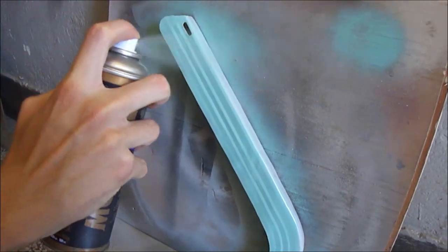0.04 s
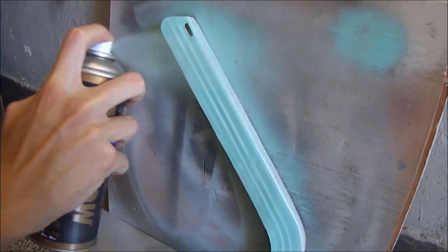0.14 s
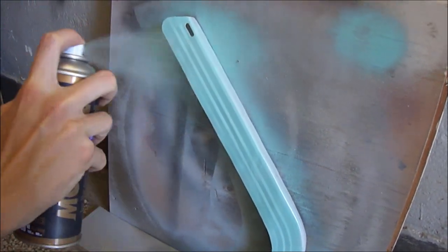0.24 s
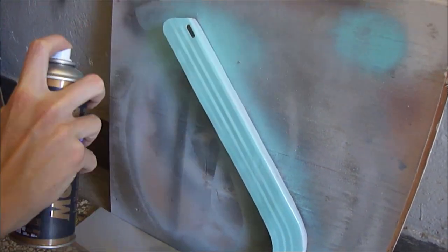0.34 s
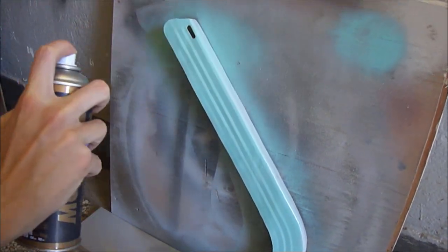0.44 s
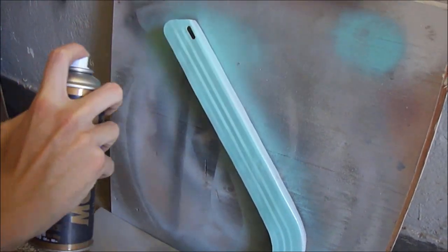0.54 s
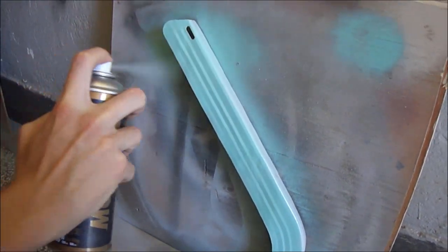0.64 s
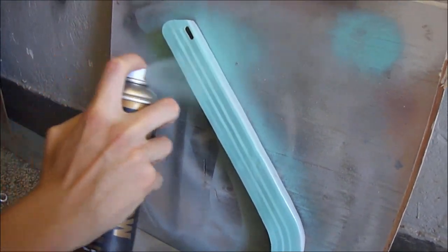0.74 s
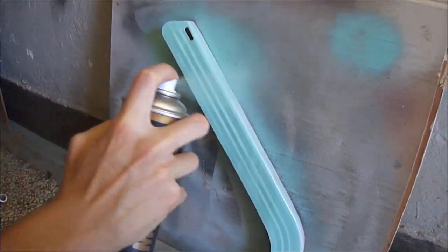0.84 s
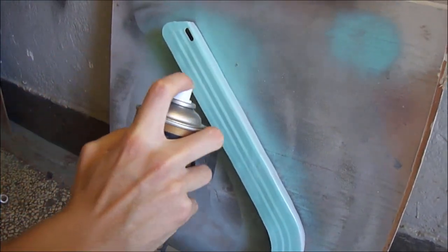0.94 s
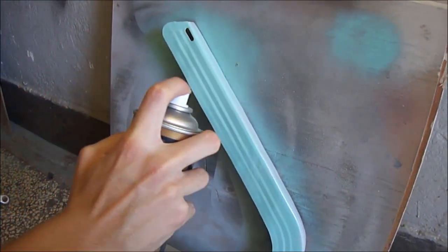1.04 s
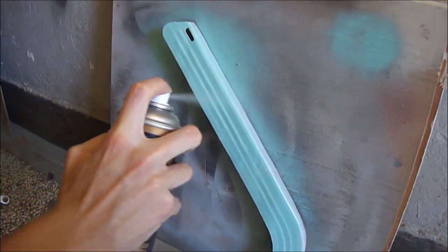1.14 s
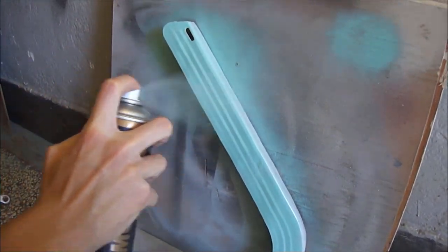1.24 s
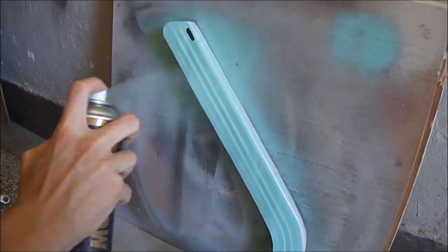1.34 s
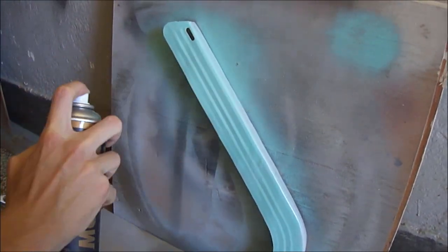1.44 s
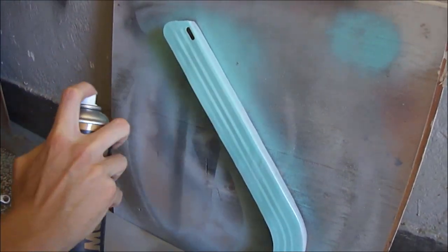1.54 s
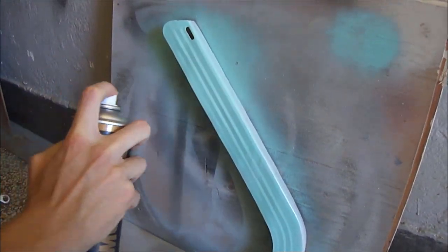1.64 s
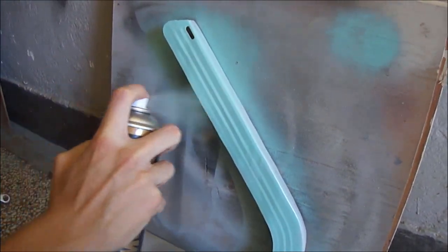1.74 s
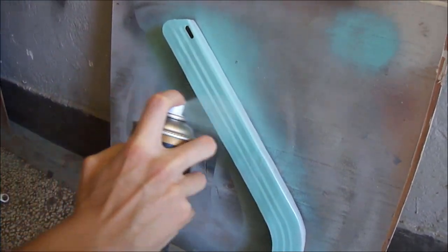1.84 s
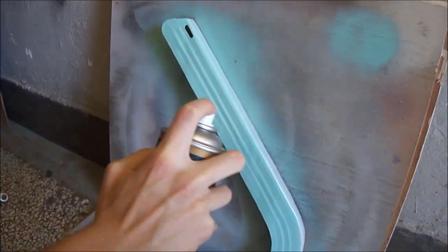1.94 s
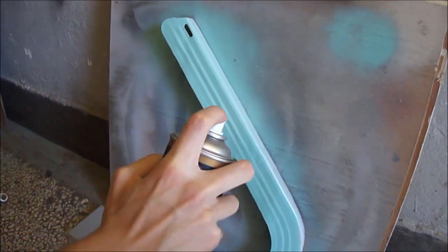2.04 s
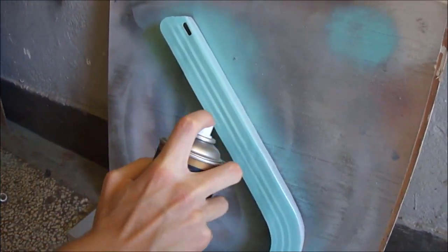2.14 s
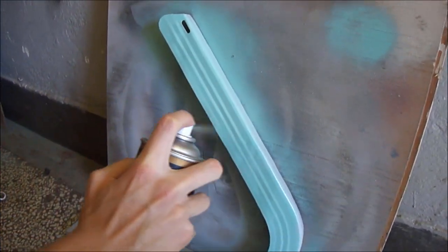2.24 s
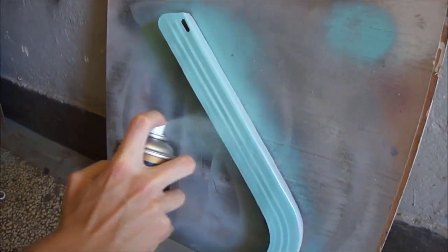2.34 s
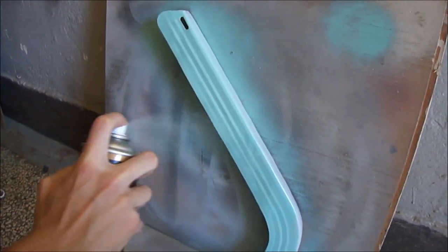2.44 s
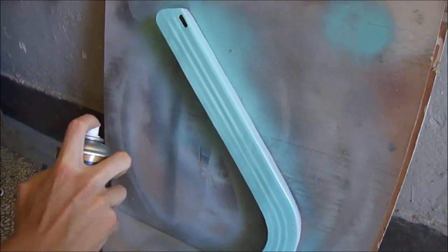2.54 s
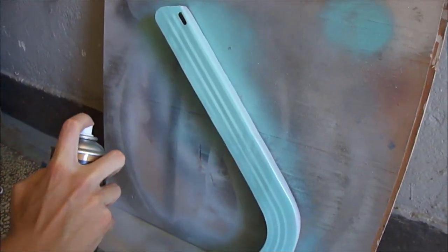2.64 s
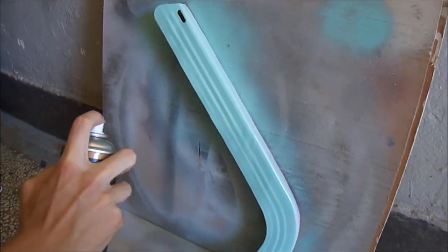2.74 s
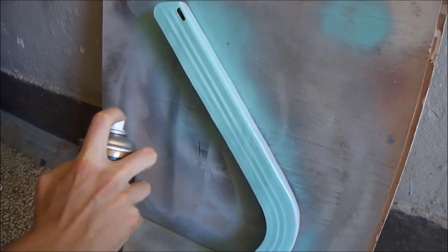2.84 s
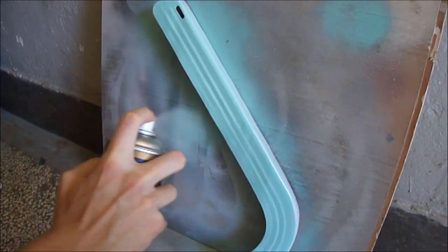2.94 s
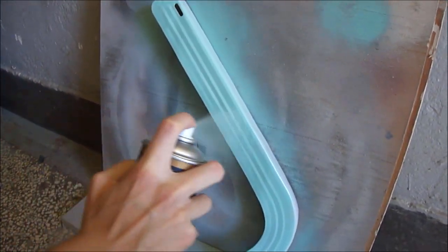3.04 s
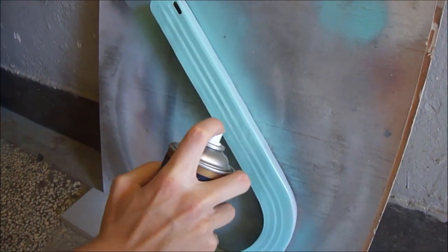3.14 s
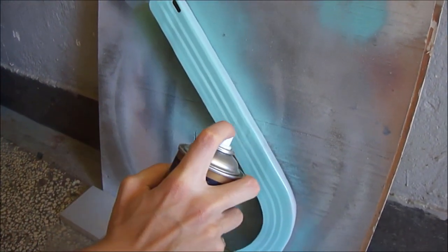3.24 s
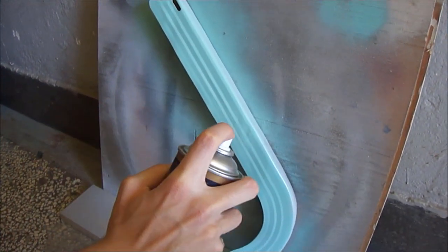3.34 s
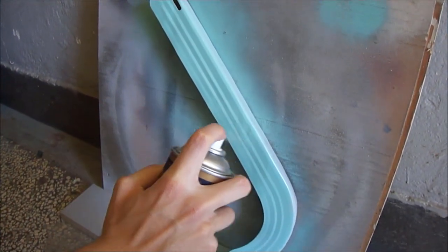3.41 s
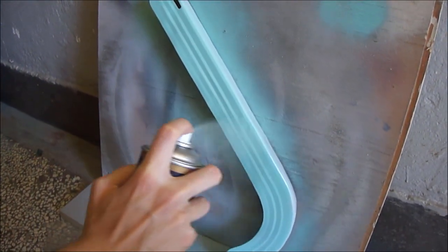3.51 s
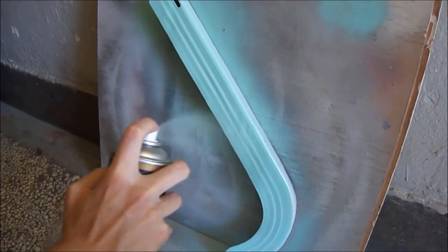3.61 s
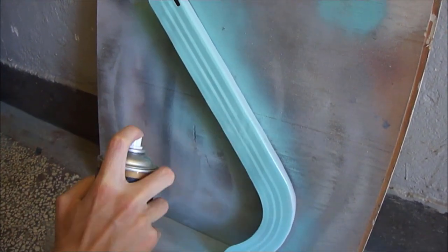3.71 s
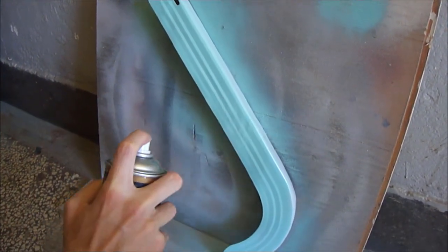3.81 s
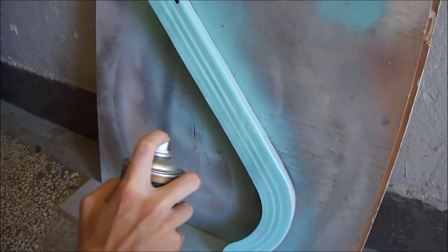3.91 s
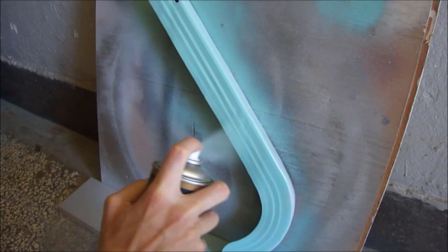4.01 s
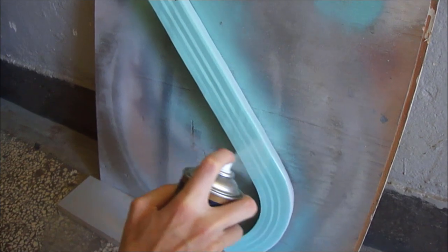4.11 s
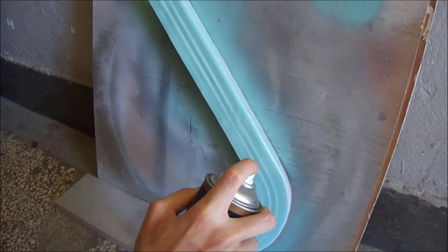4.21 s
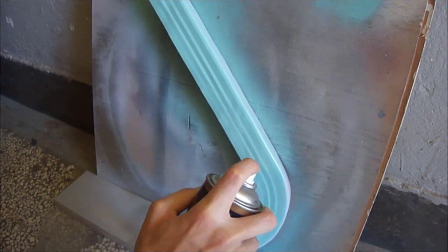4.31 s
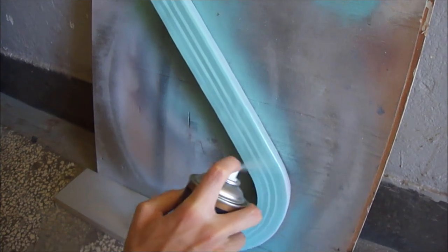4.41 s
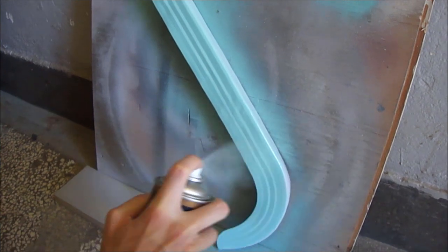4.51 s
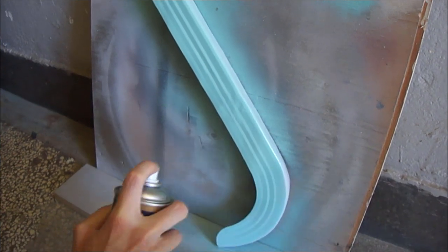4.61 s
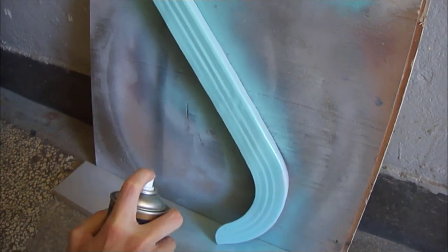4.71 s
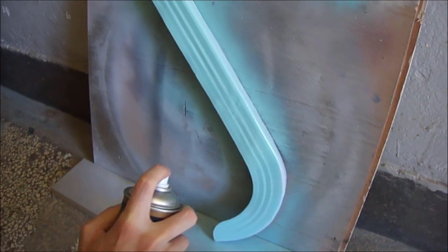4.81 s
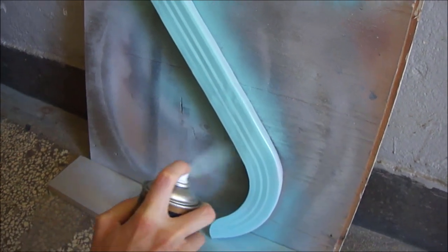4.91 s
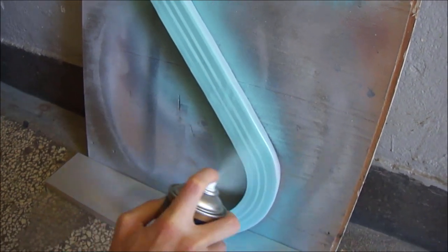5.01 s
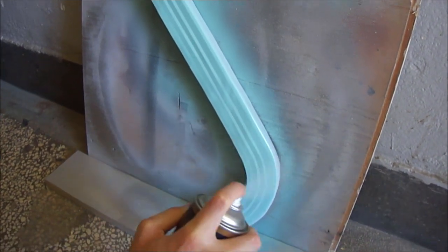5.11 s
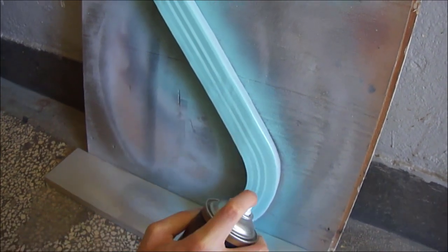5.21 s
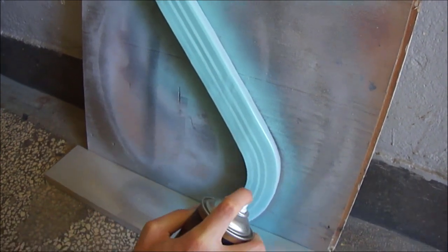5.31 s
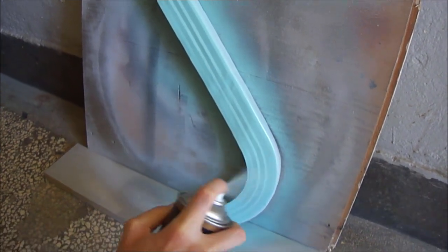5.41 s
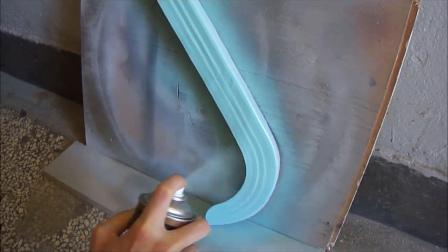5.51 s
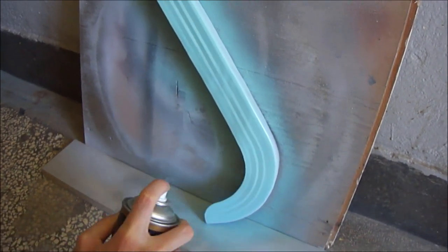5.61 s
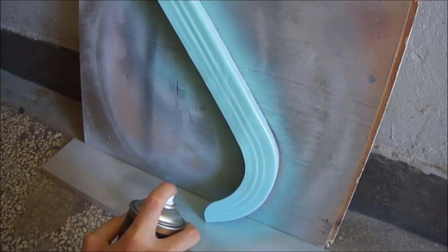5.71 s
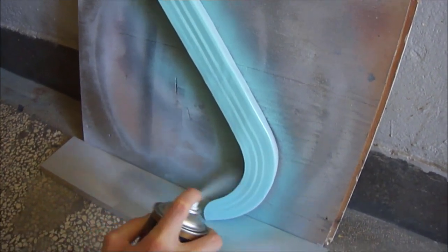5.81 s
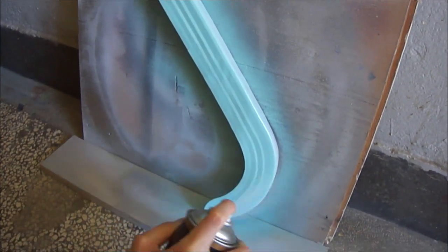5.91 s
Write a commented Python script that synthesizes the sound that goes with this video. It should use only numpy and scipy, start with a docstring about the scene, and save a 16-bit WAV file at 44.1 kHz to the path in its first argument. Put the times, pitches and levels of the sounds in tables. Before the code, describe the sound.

A spray paint can hisses in a dozen short, quick bursts, with light mixing ball ticks and a faint fan hum in a workshop.

```python
"""A distant fan hums in a workshop, and at once a spray can starts on a part on a leaning board.
Each burst opens thin, surges into a hiss with a hollow ring and snaps shut; close echoes comb it
as the hand sweeps, and the room rings on. In the early gaps fingers shift on the can and the mixing
ball ticks. The nozzle spits now and then, and the last of the twelve bursts are shorter and softer."""
import sys
import numpy as np
from scipy import signal
from scipy.fft import rfft, irfft, next_fast_len
from scipy.io import wavfile
from scipy.ndimage import map_coordinates

SR = 44100
rng = np.random.default_rng(int(sys.argv[2]) if len(sys.argv) > 2 else 0)


def wrap_up_sound(samples):
    """Save the sound to the file named by the first command line argument, as 16-bit audio."""
    columns = np.atleast_2d(samples).T
    # keep every value between -1 and 1, then stretch to whole-number steps
    tamed = np.clip(columns, -1, 1)
    steps = np.round(tamed * 32767).astype(np.int16)
    wavfile.write(sys.argv[1], SR, steps)


N = 262836

# the fan's wash of air: frequency_hz, relative_db
FAN_AIR = [(25, -13), (45, -13.5), (100, -3.5), (200, -2), (400, 3), (800, 2.5), (1300, 0), (1800, -4),
           (2800, -12.5), (4000, -10.5), (6000, -14.5), (9000, -19), (11000, -20)]
# the fan's hum tones: pitch_hz, rms_db
FAN_HUM = [(236, -68.5), (271, -59)]
# the fan's narrow drones and whirs: pitch_hz, width_hz, rms_db
FAN_WHIRS = [(97.6, 18, -69), (139.6, 14, -67.5), (277, 18, -68), (460, 18, -64), (568, 25, -67),
             (730, 35, -62.5), (882, 10, -66.5), (2230, 230, -58), (3024, 130, -63.5), (7900, 130, -74)]
# the workshop's reverb time: frequency_hz, t60_s
ROOM_DECAY = [(200, 0.24), (1000, 0.73), (2500, 0.6), (5000, 0.47), (8000, 0.52), (11000, 0.32)]
# fingers shifting on the can: centre_s, level_db
FINGER_RUBS = [(0.02, -62), (0.58, -64), (1.07, -53), (2.2, -56), (2.76, -65), (2.86, -56)]
# the mixing ball touching the wall: start_s, peak_db
BALL_TICKS = [(0.507, -28.5), (0.627, -37), (1.033, -32), (1.101, -33), (1.589, -32), (2.117, -33.5),
              (2.134, -34), (2.8195, -24), (3.2447, -20)]
# the can's modes: pitch_hz, width_hz, relative_db
CAN_MODES = [(1500, 370, -9), (2480, 200, 4), (3720, 1800, 1), (5200, 760, 0), (6600, 870, -6),
             (9500, 1200, -5)]
# the jet's bright hiss: frequency_hz, relative_db
JET_HISS = [(300, -62), (1500, -14.5), (2200, -6), (2900, -5.5), (3500, -2), (4600, 2), (6200, 1.5),
            (6800, -1.5), (7800, -2.5), (8900, -4), (10000, -2), (10450, -1), (10800, -2.5)]
# the darker rush of the slow, wide plume: frequency_hz, relative_db
PLUME_RUSH = [(60, -38), (250, -14.5), (550, -2.5), (1000, -2.5), (1800, 2), (2600, -2), (4000, -9.5),
              (8000, -50)]
# the hollow ring in the jet: pitch_hz, width_hz, relative_db
HOLLOW_MODES = [(996, 180, -16.5), (1536, 190, -15), (2306, 300, -6.5), (2470, 103, -2.5)]
# nozzle presses; fade runs across the stroke, dip is at its middle, hollow and fizz ride on level:
# start_s, shut_s, opening_s, level_db, fade_db, dip_db, hollow_db, fizz_db
PRESSES = [ (0.04, 0.363, 0.022, -23, 1.5, 1.9, -14.5, 3.5),
           (.656, 0.906, 0.051, -24, 2.5, 0.2, -12.5, 2.5), (1.161, 1.442, 0.042, -24, 6, 1.5, -12.5, 3),
           (1.729, 1.952, .044, -24.5, 0.5, -0.1, -11.5, 5), (2.276, 2.534, 0.062, -24, 10, 1.5, -8, 5),
           (2.887, 3.158, 0.028, -24, -5.5, 1.5, -9.5, 5), (3.451, 3.705, 0.023, -23, 6.5, 0.8, -9, 3.5),
           (3.982, 4.214, 0.037, -23.4, 1.5, 2, -10, 3.5), (4.44, 4.635, 0.028, -24, 7.5, 0.1, -9, 4),
           (4.916, 5.184, 0.028, -25.5, -5, -0.5, -8.5, 4.5), (5.406, 5.601, 0.034, -26, 2.9, 0, -9.5, 5),
           (5.834, 6.005, 0.031, -26.6, 4, 1, -10, 7)]
# close echoes as the hand works down the part: time_s, board_delay_ms, far_delay_ms, board_gain
ECHO_PATHS = [(.04, 1.06, 1.23, .5), (.36, .95, 1.13, .42), (.66, .88, 1.87, .36), (1.44, .855, 1.8, .3),
              (1.95, .82, 1.74, .36), (2.28, .8, 1.68, .33), (2.54, .83, 1.51, .33),
              (2.89, .835, 1.53, .52), (3.16, .8, 1.6, .52), (3.71, .77, 1.47, .42), (3.98, .74, 1.58, .46),
              (4.21, .69, 1.51, .46), (4.44, .7, 1.29, .35), (4.92, .75, 1.2, .26), (5.6, .72, 1.03, .24),
              (5.85, .75, 1.24, .24)]
# paint spitting in the nozzle: start_s, relative_db
NOZZLE_SPITS = [(0.084, -5.5), (1.1615, -17.5), (1.1847, -8), (1.7315, -32), (2.284, -16), (2.324, -16),
                (3.074, -9), (4.0, -15), (4.4453, -21), (5.4092, -22)]

# a barely open valve chokes the body more than the fizz, so each burst starts and ends thin
OPENING_DB, OPENING_FIZZ_DB = 22, 16
CLOSING_S, CLOSING_DB, CLOSING_FIZZ_DB = 0.057, 6.5, 2
# the first rush of gas overshoots just after the press
SURGE_DB, SURGE_AT_S, SURGE_WIDTH_S = 2, 0.042, 0.015
# in every stroke the fizz fades and dips, and the hollow ring swells in the middle
FIZZ_FADE_DB, FIZZ_DIP_DB, RING_SWELL_DB = 1, 0.9, 1.5


def amp(db):
    """Decibels to gain."""
    return 10 ** (np.asarray(db) / 20)


def unit(x):
    """Scale to rms 1."""
    return x / np.sqrt(np.mean(x ** 2) + 1e-20)


def along(points, hz):
    """Read a curve of (frequency_hz, value) points on a log axis."""
    f, v = np.transpose(points)
    return np.interp(np.log(hz + 1), np.log(f + 1), v)


def wobble(rate, size):
    """A smooth random curve with rate knots a second."""
    return map_coordinates(rng.standard_normal(size // 16), [np.arange(size) * rate / SR], mode="wrap")


def filtered(x, response):
    """Shape x with a frequency response."""
    m = next_fast_len(len(x) + 8192)
    return irfft(rfft(x, m) * response(np.fft.rfftfreq(m, 1 / SR)), m)[:len(x)]


def noise(spectrum, size):
    """Coloured noise of rms 1."""
    return unit(filtered(rng.standard_normal(size), lambda hz: amp(along(spectrum, hz))))


def resonance(hz, centre, width):
    """Causal response of one damped mode."""
    return 1j * hz * width / (centre ** 2 - hz ** 2 + 1j * hz * width)


def ringing_noise(modes, size):
    """Noise of rms 1 ringing in modes of (pitch_hz, width_hz, relative_db)."""
    def peaks(hz):
        return sum(amp(db) * abs(resonance(hz, pitch, width)) ** 2 for pitch, width, db in modes)
    return unit(filtered(rng.standard_normal(size), peaks))


def delayed(x, ms):
    """x heard through a gliding delay."""
    return map_coordinates(x, [np.arange(len(x)) - ms * SR / 1000], order=3)


def add(track, start_s, x):
    """Mix x into the track at start_s."""
    part = track[max(round(start_s * SR), 0):][:len(x)]
    part += x[:len(part)]


def fan(air_db=-46.5, swell_db=0.6, waver_db=1.0, drift_rad=0.88):
    """The bed, a distant fan: a slightly unsteady hum, thin whirs and a wash of air."""
    t = np.arange(N) / SR
    hum = np.zeros(N)
    for hz, db in FAN_HUM:
        peak = np.sqrt(2) * amp(db + waver_db * wobble(4.03, N))
        hum += peak * np.sin(2 * np.pi * hz * t + drift_rad * wobble(4, N))
    whirs = sum(amp(db) * ringing_noise([(hz, width, 0)], N) for hz, width, db in FAN_WHIRS)
    air = amp(air_db + swell_db * wobble(5.2, N)) * noise(FAN_AIR, N)
    return hum + whirs + air


def workshop(x, predelay_s=0.0049):
    """The room's diffuse answer to x; the mids hang on longest."""
    hz, t, spectra = signal.stft(rng.standard_normal(SR), SR, nperseg=256)
    decay = amp(-60 * t / along(ROOM_DECAY, hz)[:, None])
    tail = signal.istft(spectra * decay, SR, nperseg=256)[1]
    tail *= np.clip(np.arange(len(tail)) / SR / predelay_s - 1, 0, 1)
    return signal.fftconvolve(x, tail / np.linalg.norm(tail))


def fingers(width_s=0.021):
    """Fingers shift on the can: faint, soft swells of hiss."""
    t = np.arange(N) / SR
    swells = sum(amp(db) * np.exp(-((t - s) / width_s) ** 2 / 2) for s, db in FINGER_RUBS)
    return swells * noise(JET_HISS, N)


def mixing_ball(contact_t60_s=0.0096, room_db=-10):
    """Short contacts ring the can, which the paint inside damps."""
    def can(hz):
        return sum(amp(db) * resonance(hz, pitch, width) for pitch, width, db in CAN_MODES)
    out, t = np.zeros(N), np.arange(SR // 16) / SR
    for start_s, peak_db in BALL_TICKS:
        contact = rng.standard_normal(len(t)) * amp(-60 * t / contact_t60_s)
        tick = filtered(contact, can)
        add(out, start_s, amp(peak_db) * tick / np.abs(tick).max())
    return out + amp(room_db) * workshop(out)[:N]


def spits(trim_db=-8, t60_s=0.022):
    """Paint spits in the nozzle: sharp, fast-dying puffs of hiss."""
    out, t = np.zeros(N), np.arange(SR // 16) / SR
    for start_s, db in NOZZLE_SPITS:
        add(out, start_s, amp(db + trim_db - 60 * t / t60_s) * noise(JET_HISS, len(t)))
    return out


def close_echoes(jet, time_s, travel, rebound_gain=.55, far_gain=.23, scatter_gain=.125):
    """Echo paths change with the hand, so a comb of peaks glides through the hiss."""
    path_s, *columns = np.transpose(ECHO_PATHS)
    board_ms, far_ms, board_gain = (np.interp(time_s, path_s, column) for column in columns)
    board = board_gain * delayed(jet, board_ms)
    # a second trip between can and board sharpens the comb
    rebound = rebound_gain * board_gain * delayed(board, board_ms)
    far = far_gain * delayed(jet, far_ms)
    # seven weak echoes off fingers, can and part: delay_ms, glide_ms
    paths = rng.uniform([.15, -.12], [2.6, .12], (7, 2))
    scatter = sum(rng.choice([-1, 1]) * delayed(jet, ms + glide * travel) for ms, glide in paths)
    return (jet + board + rebound + far + scatter_gain * scatter) / np.sqrt(1 + board_gain ** 2)


def nozzle_jet(press, t, travel, rush_db=-13.5, ring_trim_db=-2.26, crack_s=.006, shut_t60_s=0.032):
    """Gas and paint leave the valve for one press: hiss, fizz, low rush and hollow ring."""
    start_s, shut_s, opening_s, level_db, fade_db, dip_db, hollow_db, fizz_db = press
    held_s = shut_s - start_s
    opening = np.clip(1 - t / opening_s, 0, 1) ** 2
    closing = np.clip(1 - (held_s - t) / CLOSING_S, 0, 1) ** 2
    middle = np.sin(np.pi * travel) ** 2
    flow = amp(-OPENING_DB * opening - CLOSING_DB * closing)
    body_gain = flow * amp(fade_db * (.5 - travel))
    fizz_flow = amp(-OPENING_FIZZ_DB * opening - CLOSING_FIZZ_DB * closing)
    fizz_gain = fizz_flow * amp(fizz_db + FIZZ_FADE_DB * (.5 - travel) - FIZZ_DIP_DB * middle)
    # the hiss splits at 7.5 kHz into body and fine fizz
    hiss = noise(JET_HISS, len(t))
    fizz = filtered(hiss, lambda hz: 1 / (1 + (7500 / (hz + 1)) ** 8))
    jet = body_gain * (hiss - fizz) + fizz_gain * fizz
    jet += flow * amp(rush_db) * noise(PLUME_RUSH, len(t))
    # turbulence excites the hollow ring
    ring_gain = body_gain * amp(ring_trim_db + hollow_db + RING_SWELL_DB * middle)
    jet += ring_gain * ringing_noise(HOLLOW_MODES, len(t))
    # the valve cracks open and snaps shut
    attack = np.clip((t - t[0]) / crack_s, 0, 1)
    release = amp(-60 * np.maximum(t - held_s, 0) / shut_t60_s)
    surge_db = SURGE_DB * np.exp(-((t - SURGE_AT_S) / SURGE_WIDTH_S) ** 2)
    # paint and gas leave unevenly: drift, flutter and sputter
    uneven_db = 0.35 * wobble(25.5, len(t)) + 0.98 * wobble(67.7, len(t)) + 0.94 * wobble(600, len(t))
    return jet * attack * release * amp(level_db + surge_db - dip_db * middle + uneven_db)


def spray(direct_db=-0.2, room_db=-8.0, lead_s=.005):
    """The lead sound: one hand stroke a press, its jet combed by close echoes and sent to the room."""
    out, t = np.zeros(N), np.arange(SR // 2) / SR - lead_s
    for press in PRESSES:
        start_s, shut_s = press[:2]
        travel = np.clip(t / (shut_s - start_s), 0, 1)  # 0 to 1 across the stroke
        jet = nozzle_jet(press, t, travel)
        add(out, start_s - lead_s, amp(direct_db) * close_echoes(jet, start_s + t, travel))
        add(out, start_s - lead_s, amp(room_db) * workshop(jet))
    return out


def scene():
    """The mono mix: the can up front, the fan far behind it."""
    return (spray() + spits() + mixing_ball() + fingers() + fan())[None]


def record(dry):
    """A steep high cut takes off the very top."""
    cutoff_hz, edge_hz = 11080, 100
    return np.array([filtered(x, lambda hz: np.clip((cutoff_hz - hz) / edge_hz + .5, 0, 1)) for x in dry])


dry = scene()
out = record(dry)
wrap_up_sound(out)
```